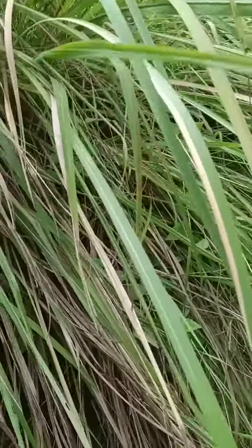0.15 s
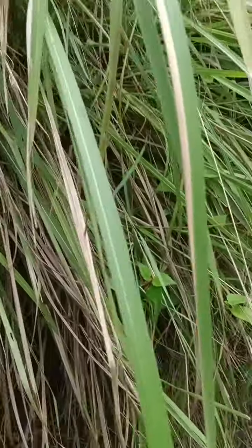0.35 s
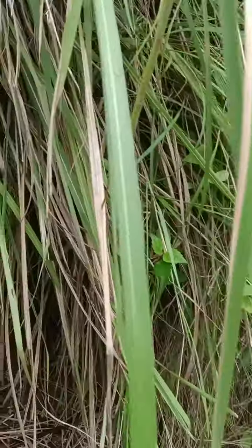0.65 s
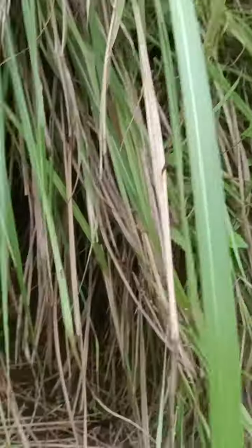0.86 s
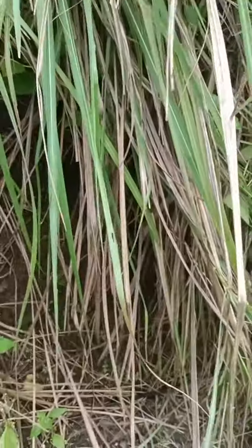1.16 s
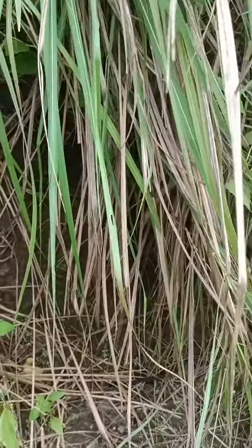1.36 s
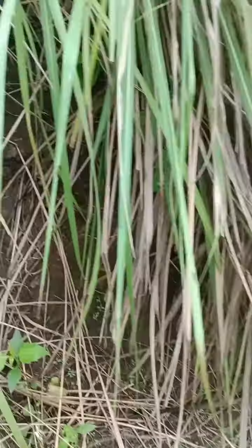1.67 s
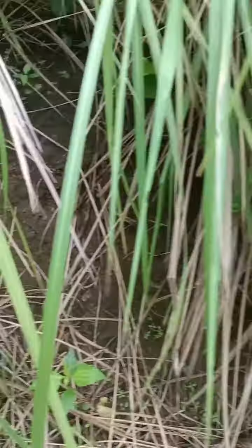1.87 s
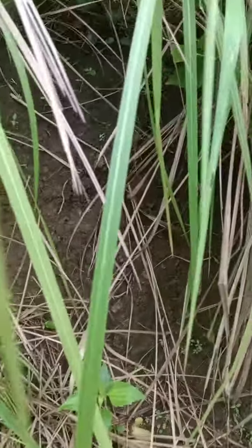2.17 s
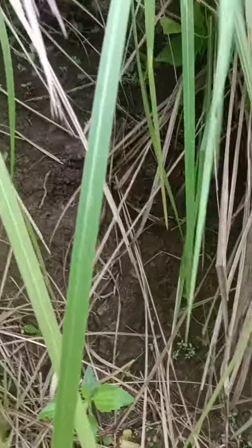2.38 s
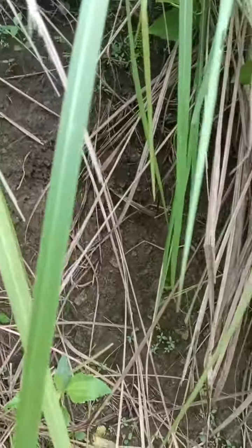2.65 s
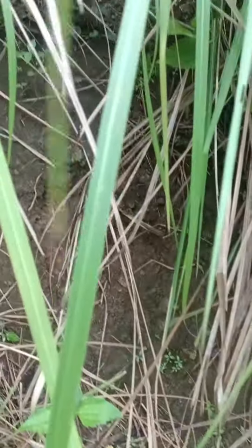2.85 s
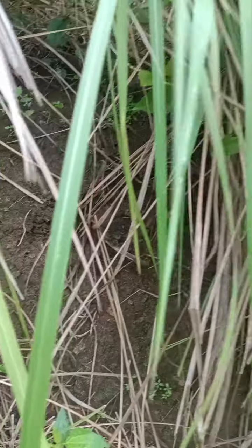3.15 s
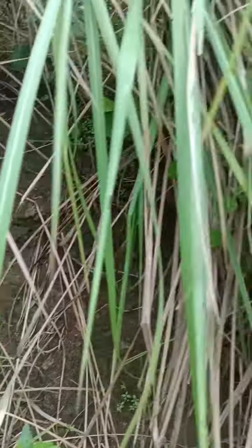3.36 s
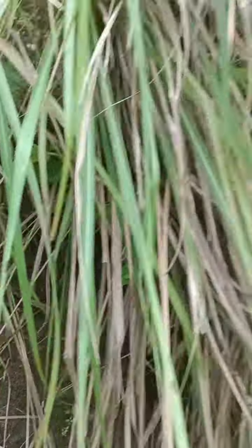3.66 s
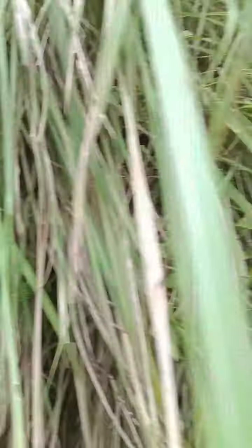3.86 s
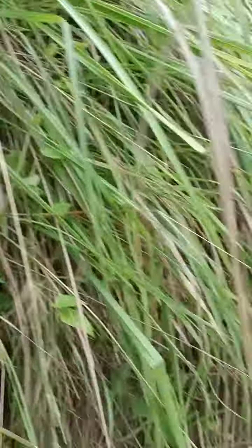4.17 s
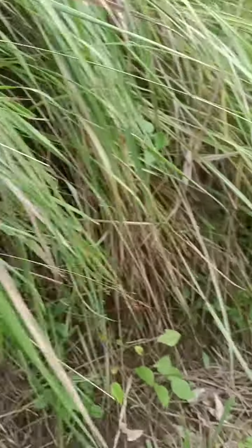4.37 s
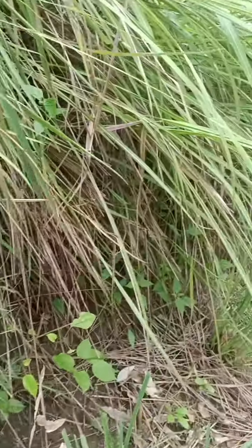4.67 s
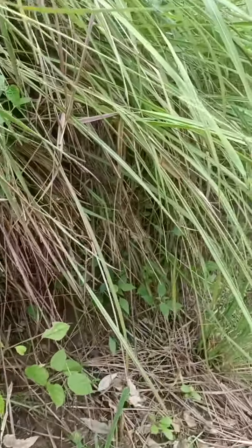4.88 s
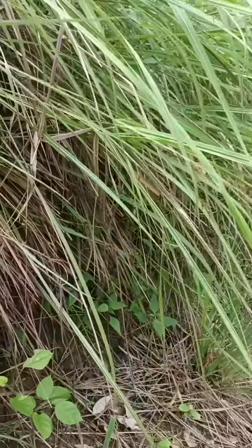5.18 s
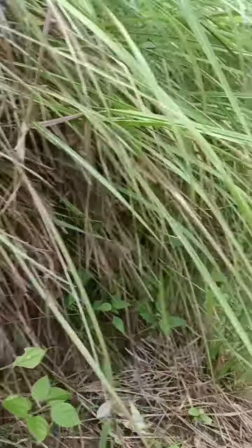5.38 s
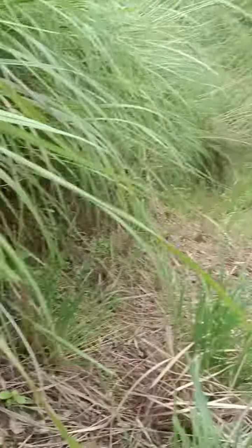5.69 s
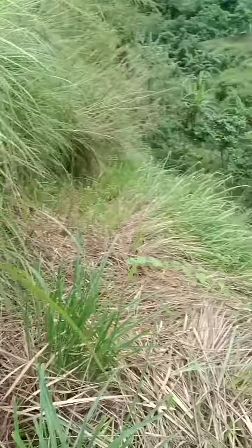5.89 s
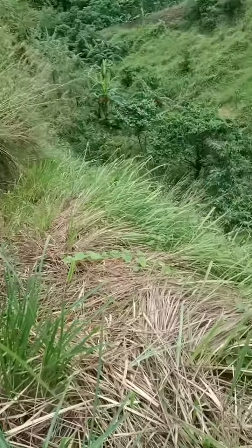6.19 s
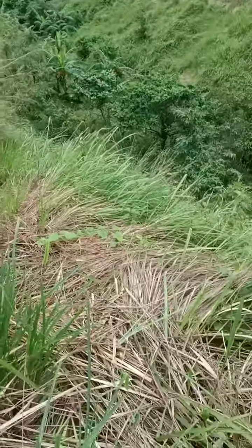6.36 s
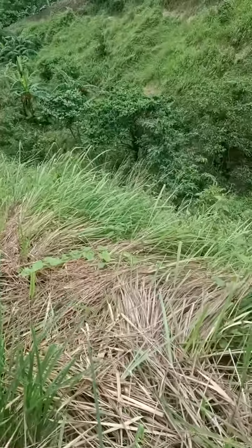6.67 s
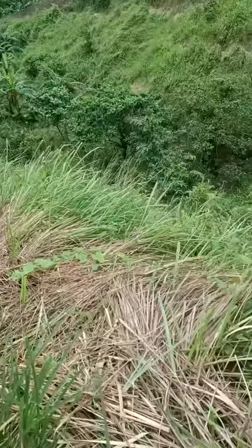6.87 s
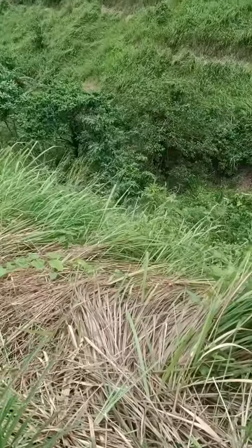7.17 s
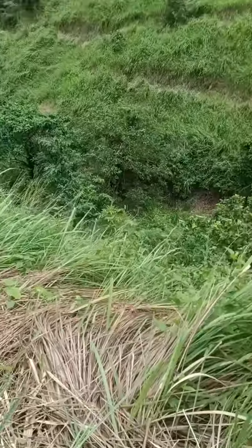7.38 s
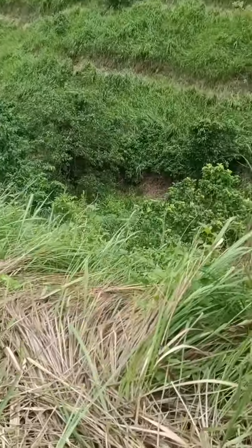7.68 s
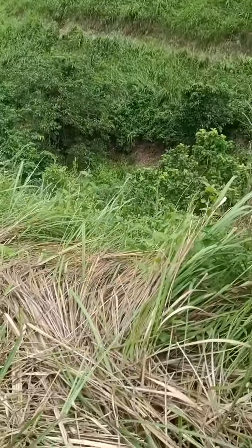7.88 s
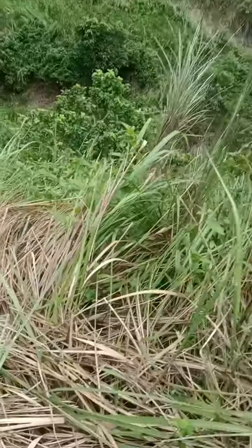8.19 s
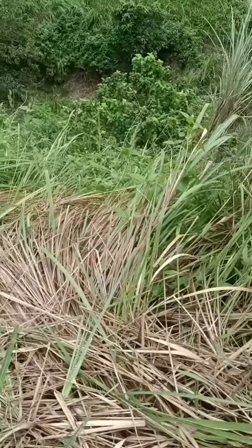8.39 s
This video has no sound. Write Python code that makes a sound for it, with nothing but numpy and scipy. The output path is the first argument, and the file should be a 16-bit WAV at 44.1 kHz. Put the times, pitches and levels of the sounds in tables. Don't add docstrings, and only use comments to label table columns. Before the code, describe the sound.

A person pushes through tall dry grass in the open, heard very close on a small handheld stereo recorder. At 0 s a loud, bright swish is already falling away; from about 0.5 to 1.1 s the blades surge again, hissing and crackling densely. Around 1.25 to 1.6 s crisp ticks and a tight burst of stem snaps cut through, with dull bumps on the case. The rustle continues near 2 s, then thins to sparse, faint crackles by 3 to 4 s. At 4.2 to 5.6 s broader, softer sweeps return, with a hard snap at 4.7 s and low thumps near 4.2 and 5.4 s. From 6 to 8.5 s come short, brighter brushes, strongest near 6.8 s, and scattered ticks, with a stem crack and small knock near 8.1 s. Hollow leg drags and faint low air lie underneath; the grass leans slightly left.

```python
import sys
import numpy as np
from scipy import signal
from scipy.io import wavfile
from scipy.ndimage import uniform_filter1d

SR = 44100
rng = np.random.default_rng(int(sys.argv[2]) if len(sys.argv) > 2 else 0)


def to_wav(s):
    ch = np.atleast_2d(s).T
    pcm = np.round(np.clip(ch, -1, 1) * 32767)
    wavfile.write(sys.argv[1], SR, pcm.astype(np.int16))


def rack_gain(trim_db):
    fader = np.asarray(trim_db, float)
    return 10 ** (fader / 20)


N = 376613

# time in seconds, level in dB, left-right balance in dB.
WALK = [(0.0, -67.5, 5.5), (0.97, -29, 0.5), (1.6, -46, 0.5), (2.03, -35.5, 2.5), (3.28, -57.5, 2.5),
        (4.18, -45.5, 3.5), (4.36, -42.0, 5.5), (5.56, -44.5, 3.5), (5.912, -40, 4.5), (7.29, -69.5, 6),
        (7.69, -39.5, 7.5), (8.54, -63, 3.5)]
# peak in seconds, level in dB, release in seconds, fine tips in relative dB.
SWEEPS = [(0, -28.5, 0.67, 0), (0.54, -40, 0.14, 0.5), (0.75, -32.5, 0.24, 2), (1.27, -35, 0.064, 2),
          (1.53, -34.5, 0.23, 1.5), (2.43, -43.5, 0.3, 1.0), (2.67, -47.5, 0.14, 4.5),
          (3.26, -52.5, 0.14, 2.5), (3.41, -43.5, 0.014, 1), (3.63, -52.5, 0.27, 4.5),
          (3.82, -49.5, 0.099, 3.5), (3.96, -45.5, 0.087, 2), (4.28, -40.5, 0.49, -0.5),
          (4.5, -37.5, 0.11, 2), (5.03, -41, 0.98, 2), (5.23, -36.5, 0.4, 1), (5.77, -46, 0.057, 7),
          (6.1, -41, 0.096, 4), (6.25, -42, 0.18, 0), (6.59, -45, 0.16, 3), (6.75, -40.5, 0.38, 3.5),
          (6.83, -34, 0.1, 4), (6.98, -42, 0.057, 1.5), (7.12, -46.5, 0.19, 0.5), (7.26, -44, 0.21, 0.5),
          (7.85, -39, 0.19, 1.5), (8.31, -39.0, 0.09, 5), (8.53, -40, 0.54, 2.5), (7.96, -39.5, .12, -3),
          (8.17, -42.5, 0.36, 0)]
RISE_PER_RELEASE, SWEEP_FALL_DB = 0.39, 20
TIPS_DB, TIPS_DB_PER_S = -1.6, 0.64
BODY_DB, BODY_SLOPE, BODY_AT_DB = -7, -0.091, -37.5
# frequency in Hz, density in dB per Hz.
BLADE_SPECTRUM = [(350, -25), (600, -17.5), (729, -19), (825, -17.5), (1800, -14), (2150, -10.5),
                  (3690, -4.5), (5910, 0.5), (9880, -5), (13200, -6), (15800, -9.5), (16500, -53)]
# frequency in Hz, left-right balance in dB.
PORT_BALANCE = [(60, -5.5), (130, -6), (290, -2), (640, 0.5), (1410, 2.5), (3100, -2), (6820, -3),
                (15000, 1.5)]
SIDES = np.array([[.5], [-.5]])
PORT_LAG_SAMPLES = 22
LEAVES_BELOW_HZ, TIPS_ABOVE_HZ = 4200, 10200
# time in seconds, likeness from 0 to 1.
IN_LINE = [(0, .3), (1.5, .2), (4, .15), (5.7, .35), (5.95, .6), (6.45, .5), (6.6, .85), (6.8, .7),
           (7.3, .8), (7.45, .45), (7.85, .55), (8.1, .5), (8.54, .65)]
IN_LINE_LAG_SAMPLES = 21
BLADE_LIKENESS, BODY_SIDE = .5, .3
# time in seconds, turn from 0 to 1.
TURN = [(0, 0.29), (2.3, 1), (2.8, 0.9), (4.2, 1), (5.6, 0.16), (5.95, 1), (6.6, 0.73), (7.35, .98),
        (7.602, 0.1), (7.999, 1), (8.54, 1)]
# frequency in Hz, width in Hz, depth from 0 to 1.
NOTCHES = [(4700, 300, 0.5), (7920, 170, 1), (10000, 2000, 0.4)]
# frequency in Hz, width in Hz, left gain, right gain.
PORT_RING = (2120, 280, 0.44, 0.081)

# start in seconds, length in seconds, level in dB.
DRAGS = [(0, 0.28, -58.5), (0.352, 0.13, -56), (.66, 0.26, -55.5), (1.277, .3, -60.5), (2.38, 0.76, -61),
         (2.495, 0.13, -54), (4.16, 0.27, -56.5), (4.803, 0.55, -62.5), (4.866, 0.051, -55),
         (5.396, 0.41, -69), (6.773, 0.33, -60), (7.795, 0.85, -65.5)]
DRAG_RISE_DB_PER_S, DRAG_FALL_DB_PER_S, DRAG_REST_DB = 150, 110, -79
# frequency in Hz, width in Hz, gain in dB.
HOLLOW = [(401, 173, 12.5), (492, 104, 5.5)]

# frequency in Hz, density in dB per Hz.
AIR_SPECTRUM = [(15, -19), (25, 9), (49, 5), (303, -7.5), (461, -5.5), (1030, -28), (1260, -14),
                (2000, -30), (2600, -10), (4400, -120)]
AIR_DB = -67.5
# frequency in Hz, left-right likeness from -1 to 1.
AIR_LIKENESS = [(60, 0.17), (180, 0.25), (550, 0.45), (1650, 0.23), (4970, -0.00089), (15000, -0.01)]

# time in seconds, peak in dB, left-right balance in dB.
TICKS = [(0.2427, -17, 7), (0.593, -22, 4.0), (0.6914, -19, -10), (1.265, -9, -1.0), (1.283, -12, 1),
         (1.3758, -18, -2), (1.8652, -21, -4), (2.4174, -21, -4), (2.4404, -17.5, 7), (2.6965, -26, -1),
         (4.4735, -19, 11), (4.541, -12, 2), (4.8339, -26, 4), (5.1284, -19, 8), (5.3895, -14, 9),
         (5.4705, -21, -5), (5.952, -20, 21), (6.1113, -33, 14), (6.1464, -21.5, 11), (6.7311, -17.5, 3),
         (6.7974, -17, 10), (6.9366, -29, 7.5), (7.1044, -31, 7.5), (7.435, -23.5, -4), (7.619, -17.5, -4),
         (7.832, -32, 5), (7.9834, -22, -1), (8.2731, -36, 5.0), (8.308, -25, 6.5), (8.339, -21, 13)]
TICK_HZ, TICK_SPREAD, TICK_BODY_DB, TICK_DB = 13000, .06, -24, -3
# time in seconds, peak in dB, ring in Hz, body in relative dB.
STEMS = [(0.5616, -12, 4520, -21), (0.8894, -18, 11500, -21), (1.2495, -18.5, 12100, -17),
         (1.4272, -12.5, 6100, -37), (1.488, -12, 12000, -12), (1.4951, -11.5, 10400, -23),
         (1.4952, -6, 5900, -14.5), (1.5225, -21, 11700, -9), (1.545, -10.5, 5750, -13),
         (1.5579, -13.5, 8350, -14), (1.8104, -20, 6750, -41), (2.1909, -24, 6000, -11),
         (2.9422, -32, 9200, -24), (3.302, -25, 5070, -9.5), (3.4054, -27, 5500, -5.5),
         (3.4224, -31, 11600, -2), (3.539, -39.5, 8000, 5.5), (3.625, -32, 3780, -2),
         (3.6476, -21.5, 5800, -12), (3.9597, -32.5, 13000, 1.5), (4.705, -18, 13000, -37),
         (4.716, -7, 3490, -24.5), (6.2487, -20, 13800, -10), (7.0954, -24, 10300, -7),
         (7.1232, -21, 6000, -7), (7.392, -29, 6100, -13), (7.5157, -36, 13400, 0.5),
         (8.095, -15.5, 14300, -20), (8.1489, -21, 8950, -32), (8.1682, -27, 8700, -16)]
STEM_SIDE = 0.75

# time in seconds, peak in dB, push in Hz, left-right balance in dB.
KNOCKS = [(0.3, -53, 60, 11), (0.89, -35, 930, -0.5), (1.493, -36.5, 1110, 0), (1.556, -34.5, 636, -9),
          (2.341, -53.5, 111, 1.5), (4.166, -39, 132, 18.5), (4.324, -39.5, 400, 4), (4.333, -50, 75, 6),
          (4.712, -49.5, 441, 14), (5.434, -42.5, 106, 22), (5.506, -46, 160, 10), (5.674, -51, 160, 13),
          (7.147, -62, 466, 3), (7.437, -68, 110, 0.5), (7.89, -50.5, 119, 21), (8.094, -45, 480, -12),
          (8.22, -57, 111, 6)]
KNOCK_LEAD_S = .012
SHUDDER_DB, SHUDDER_DB_PER_OCTAVE, SHUDDER_T60_S, SOFT_HZ = -5.5, -3.5, .1, 117

EDGE_HZ = 15820
# frequency in Hz, drop in dB.
MASKED_DROP = [(600, 20), (1150, 4), (2000, 5), (3000, 2.2), (4100, 2.5), (5000, 2.6), (6500, 4.5),
               (8000, 2.6), (11000, 8)]
# frequency in Hz, power share.
LINE_FLOOR = [(500, .05), (1200, .25), (2600, .5), (5200, .5), (8500, .4), (11000, .12), (15000, .2)]


def evened(x):
    return x / np.sqrt(np.mean(x ** 2) + 1e-20)


def read(points, hz):
    f, value = np.transpose(points)
    return np.interp(np.log(hz + 1), np.log(f + 1), value)


def add(mix, start_s, sound):
    part = mix[:, round(start_s * SR):][:, :sound.shape[1]]
    part += sound[:, :part.shape[1]]


def resonate(x, hz, width_hz):
    r = np.exp(-np.pi * width_hz / SR)
    poles = [1, -2 * r * np.cos(2 * np.pi * hz / SR), r * r]
    return signal.lfilter([(1 - r * r) / 2, 0, (r * r - 1) / 2], poles, x)


def colour(x, gain_db):
    log_gain = np.log(rack_gain(np.maximum(gain_db, -100)))
    circle = np.concatenate([log_gain, log_gain[..., -2:0:-1]], axis=-1)
    response = np.exp(np.conj(signal.hilbert(circle)))
    taps = np.fft.ifft(response).real[..., :2048]
    return signal.oaconvolve(x, np.atleast_2d(taps), axes=1)[:, :N]


def gusts(smooth_samples):
    swing = uniform_filter1d(rng.standard_normal(N), smooth_samples)
    return evened(uniform_filter1d(swing, smooth_samples))


def noise(patchy_db, likeness):
    a, b, c, d, patches = rng.standard_normal((N // 128 + 5, 257, 5)).T
    patches = uniform_filter1d(patches, size=14, axis=0)
    patches = evened(uniform_filter1d(patches, size=10, axis=1))
    same = np.clip(likeness, -1, 1)[:, None]
    left = a + 1j * b
    right = same * left + np.sqrt(1 - same ** 2) * (c + 1j * d)
    z = np.array([left, right]) * rack_gain(patchy_db * patches)
    return evened(signal.istft(z, nperseg=512, noverlap=384)[1][:, :N])


def push(t):
    s, walk_db, _ = np.transpose(WALK)
    blades = rack_gain(np.interp(t, s, walk_db)) ** 2
    tips = blades * rack_gain(TIPS_DB + TIPS_DB_PER_S * t) ** 2
    for peak_s, db, release_s, sheen_db in SWEEPS:
        away = (t - peak_s) / release_s / np.where(t < peak_s, RISE_PER_RELEASE, 1)
        sweep = rack_gain(db - SWEEP_FALL_DB * away ** 2) ** 2
        blades = blades + sweep
        tips = tips + sweep * rack_gain(sheen_db) ** 2
    blades_db = 10 * np.log10(blades)
    body_db = blades_db + BODY_DB + BODY_SLOPE * (blades_db - BODY_AT_DB)
    return blades_db, body_db, 10 * np.log10(tips)


def side_at(t):
    s, _, pan_db = np.transpose(WALK)
    return np.interp(t, s, pan_db)


def crackle(per_s, spread_db, clump_db, count):
    chance = per_s / SR * rack_gain(clump_db * gusts(500))
    size = rack_gain(spread_db * np.minimum(rng.exponential(1, N), 5)) * (rng.random(N) < chance)
    blade = rng.integers(0, count, N)
    t = np.arange(500) / SR
    out = np.zeros((2, N))
    for k, (side, short, low, high) in enumerate(rng.random((count, 4))):
        faces = rng.standard_normal((2, len(t)))
        tick = faces[0] + faces
        low_ring = resonate(tick, 1500 + 4000 * low, 1000)
        high_ring = resonate(tick, 6000 + 9000 * high, 2070)
        tick = 0.87 * tick + 1.7 * low_ring + 1.55 * high_ring
        t60_s = .0025 + 0.031 * short ** 2
        tick = tick * rack_gain(-60 * t / t60_s) * np.minimum(t / 0.00013, 1)
        tick = tick / np.linalg.norm(tick[0])
        both = signal.oaconvolve((size * (blade == k))[None], tick, axes=1)[:, :N]
        lag = round(PORT_LAG_SAMPLES * (2 * side - 1))
        out[0] += both[0] * rack_gain(4.3 * (side - .5))
        out[1] += np.roll(both[1], lag) * rack_gain(-6.0 * (side - .5))
    return evened(out)


def in_line(x, share):
    likeness = np.interp(np.arange(N) / SR, *np.transpose(IN_LINE))
    same = np.clip(share * likeness, 0, 1)
    right = same * np.roll(x[0], IN_LINE_LAG_SAMPLES) + np.sqrt(1 - same ** 2) * x[1]
    return np.array([x[0], right])


def rustle():
    t = np.arange(N) / SR
    hz = np.fft.rfftfreq(4096, 1 / SR) + 1
    slide = noise(1.6, np.zeros(257)) * rack_gain(1.2 * gusts(620) + 0.19 * gusts(150))
    drive = slide + rack_gain(-7.0) * crackle(per_s=770, spread_db=3.0, clump_db=2.5, count=20)
    tone_db = read(BLADE_SPECTRUM, hz) + SIDES * read(PORT_BALANCE, hz)
    low = 1 / (1 + (hz / LEAVES_BELOW_HZ) ** 8)
    high = 1 / (1 + (TIPS_ABOVE_HZ / hz) ** 12)
    side_db = SIDES * (side_at(t) + 0.83)
    coarse_t = t[::64]
    blades_db, body_db, tips_db = push(coarse_t)
    layers = [(in_line(drive, BLADE_LIKENESS), abs(1 - low - high), blades_db, side_db),
              (in_line(drive, 1), low, body_db, BODY_SIDE * side_db),
              (drive, high, tips_db, side_db)]
    out = np.zeros((2, N))
    for source, share, level_db, lean_db in layers:
        layer = evened(colour(source, tone_db + 10 * np.log10(share + 1e-10)))
        out += rack_gain(np.interp(t, coarse_t, level_db) + lean_db - 3.0) * layer
    return out


def shaded(x):
    turn = np.interp(np.arange(N) / SR, *np.transpose(TURN))
    for hz, width_hz, depth in NOTCHES:
        x = x - np.clip(depth * turn, 0, 1) * resonate(x, hz, width_hz)
    hz, width_hz, *gains = PORT_RING
    return x + np.array(gains)[:, None] * resonate(resonate(x, hz, width_hz), hz, width_hz)


def drag():
    flat = noise(2.0, np.full(257, .85))
    hollow = np.zeros((2, N))
    for hz, width_hz, db in HOLLOW:
        hollow += rack_gain(db) * resonate(resonate(flat, hz, width_hz), hz, width_hz)
    t = np.arange(N) / SR
    level_db = np.full(N, float(DRAG_REST_DB))
    for start_s, length_s, db in DRAGS:
        early_s = np.maximum(start_s - t, 0)
        late_s = np.maximum(t - start_s - length_s, 0)
        stroke_db = db - DRAG_RISE_DB_PER_S * early_s - DRAG_FALL_DB_PER_S * late_s
        level_db = np.maximum(level_db, stroke_db)
    return rack_gain(level_db - 5.0 - 2.8 * SIDES) * evened(hollow)


def air():
    flat = noise(0.7, read(AIR_LIKENESS, np.fft.rfftfreq(512, 1 / SR)))
    hz = np.fft.rfftfreq(4096, 1 / SR)
    floor = evened(colour(flat, read(AIR_SPECTRUM, hz) + SIDES * read(PORT_BALANCE, hz)))
    return rack_gain(AIR_DB + 0.5 + 0.5 * gusts(4000)) * floor


def snap(db, hz, body_db, pan_db):
    t = np.arange(1200) / SR
    burst = rng.standard_normal((3, 2, len(t)))
    rise = np.minimum(t / 0.00075, 1)
    crack = np.diff(burst[0], prepend=0) * (rack_gain(-60 * t / 0.0095) + 0.18 * rack_gain(-60 * t / 0.026))
    ring = 2.33 * resonate(burst[1], hz, 0.11 * hz) * rack_gain(-60 * t / 0.018)
    stalk = resonate(resonate(burst[2], 2400, 1100), 2400, 1100) + 0.2 * resonate(burst[2], 1430, 730)
    body = 4.0 * rack_gain(body_db) * stalk * rack_gain(-60 * t / 0.021)
    brightness = 0.61 * hz / 9000
    return rack_gain(db - 4 + SIDES * pan_db) * rise * (brightness * crack + ring + body)


def tip_tick(db, pan_db):
    hz = TICK_HZ * (1 + TICK_SPREAD * rng.uniform(-1.2, 1))
    return snap(db + TICK_DB, hz, TICK_BODY_DB, pan_db)


def knock(db, hz, pan_db):
    t = np.arange(5000) / SR - KNOCK_LEAD_S
    octaves = np.log2(hz / SOFT_HZ)
    shudder_db = SHUDDER_DB + SHUDDER_DB_PER_OCTAVE * octaves
    t60_s = max(SHUDDER_T60_S * 0.81 ** octaves, .01)
    swing = -np.cos(2 * np.pi * hz * t - .4) * np.exp(-(t * hz / 0.46) ** 2)
    low_hz = min(0.53 * hz, 130)
    shudder = evened(resonate(rng.standard_normal((2, len(t))), low_hz, 0.67 * low_hz))
    shudder *= rack_gain(shudder_db - 60 * t / t60_s) * np.clip(t / 0.011, 0, 1)
    far_db = np.minimum(2 * SIDES * pan_db, 0) * 3.7
    return rack_gain(db + 8.5 + far_db) * (swing + shudder)


def scene():
    mix = rack_gain(4.0) * shaded(rustle()) + drag() + air()
    for s, db, pan_db in TICKS:
        add(mix, s, tip_tick(db, pan_db))
    for s, db, hz, pan_db in KNOCKS:
        add(mix, s + 0.0018 - KNOCK_LEAD_S, knock(db, hz, pan_db))
    for s, db, hz, body_db in STEMS:
        add(mix, s, snap(db, hz, body_db, STEM_SIDE * side_at(s)))
    return mix


def masked(x):
    turn = np.array([[1, 1], [1, -1]]) / np.sqrt(2)
    frame = dict(window="cosine", nperseg=2048, noverlap=1024)
    hz, _, z = signal.stft(turn @ x, SR, **frame)
    lines = abs(z) ** 2
    first = np.arange(len(hz)) // 8 * 8
    power = uniform_filter1d(lines, size=8, axis=1, origin=-4)[:, first]
    hiss = lines[:, hz > 2000].mean(axis=(0, 1))
    share_db = uniform_filter1d(10 * np.log10(power / hiss + 1e-20), size=2, axis=2)
    usual_db = np.median(share_db, axis=2, keepdims=True)
    keep = share_db > usual_db - read(MASKED_DROP, hz[first])[:, None]
    keep &= lines > power * read(LINE_FLOOR, hz)[:, None]
    frame_db = 10 * np.log10(lines.mean(axis=(0, 1)) + 1e-20)
    keep |= np.diff(frame_db, prepend=0) > 3
    return turn @ signal.istft(z * keep, SR, **frame)[1][:, :N]


def roll_off(x):
    return signal.sosfilt(signal.butter(12, 17020, fs=SR, output="sos"), x)


def record(dry):
    edge = signal.firwin(601, EDGE_HZ, window=("kaiser", 9), fs=SR)
    limited = signal.oaconvolve(dry, edge[None], "same", axes=1)
    return roll_off(masked(limited))


dry = scene()
out = record(dry)
to_wav(out)
```